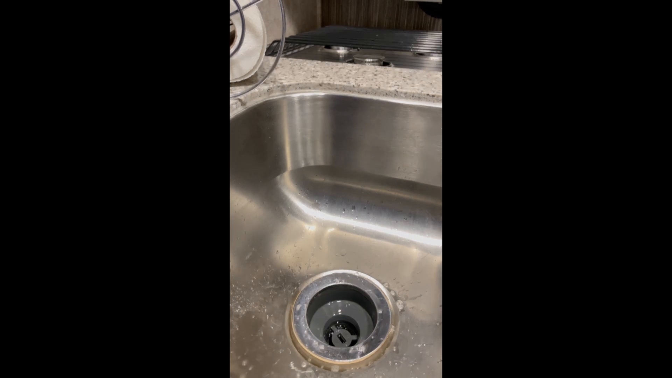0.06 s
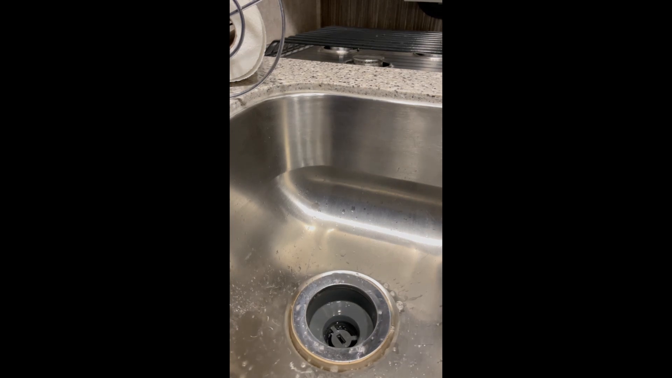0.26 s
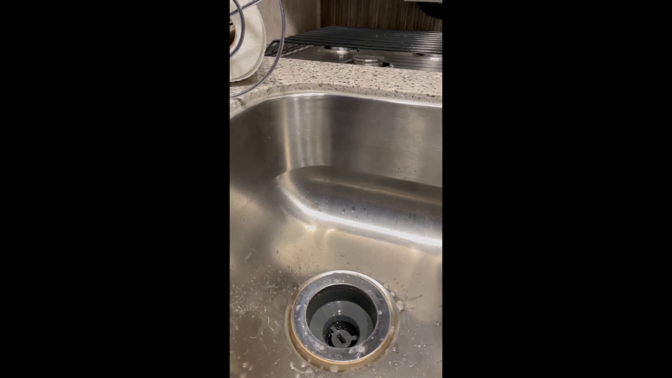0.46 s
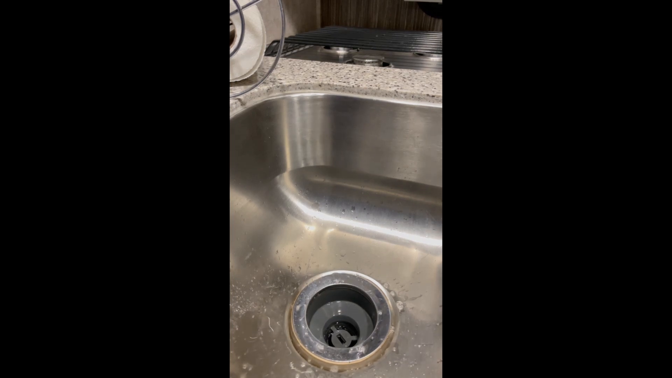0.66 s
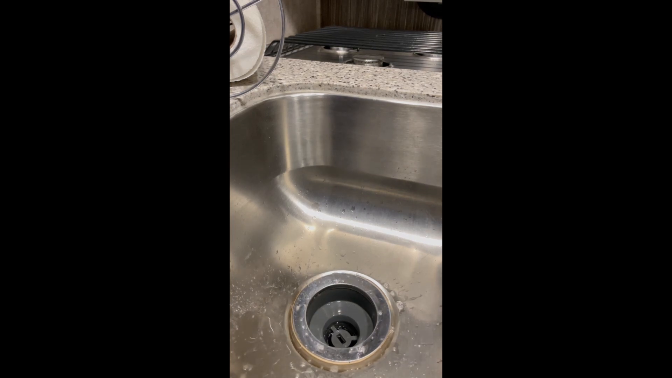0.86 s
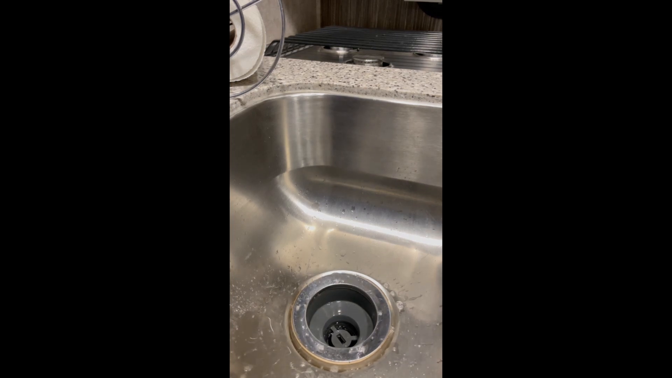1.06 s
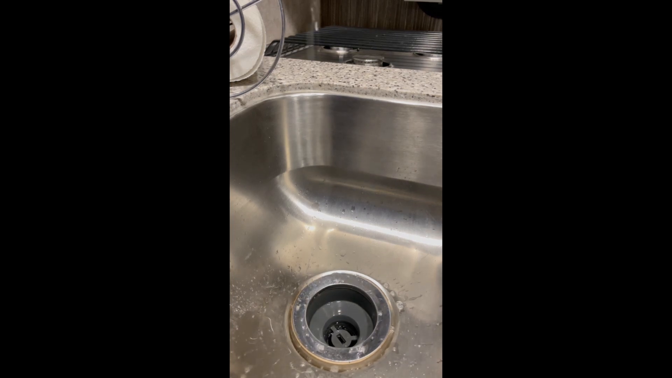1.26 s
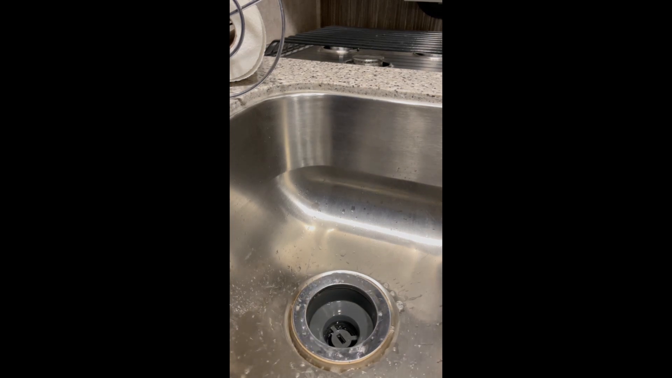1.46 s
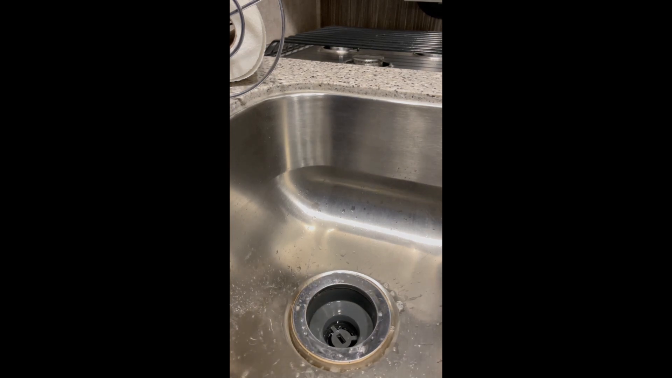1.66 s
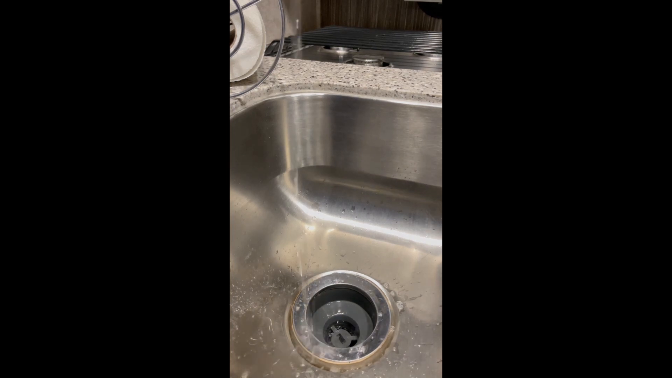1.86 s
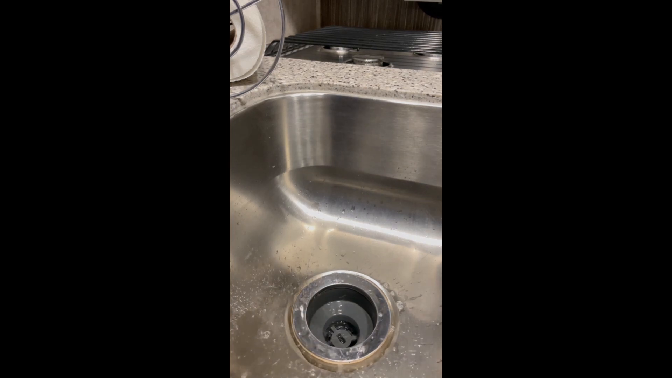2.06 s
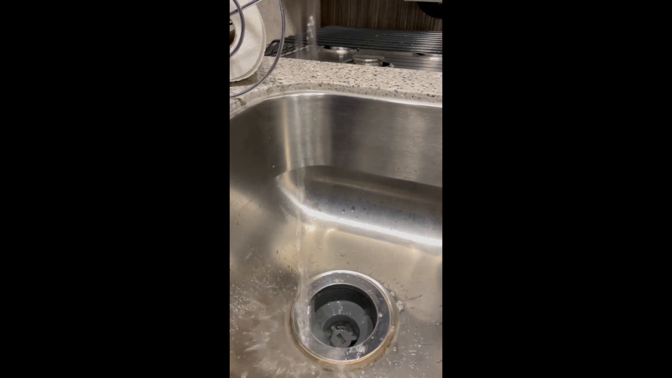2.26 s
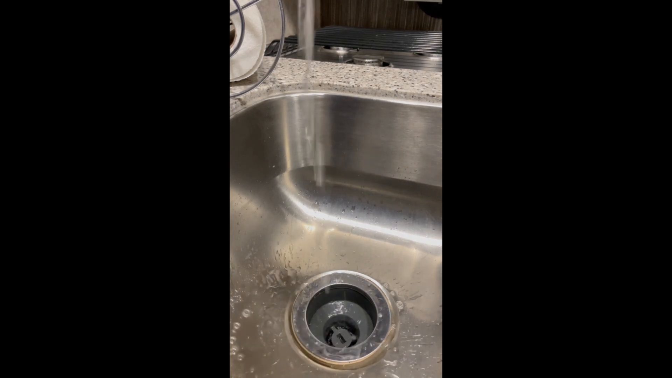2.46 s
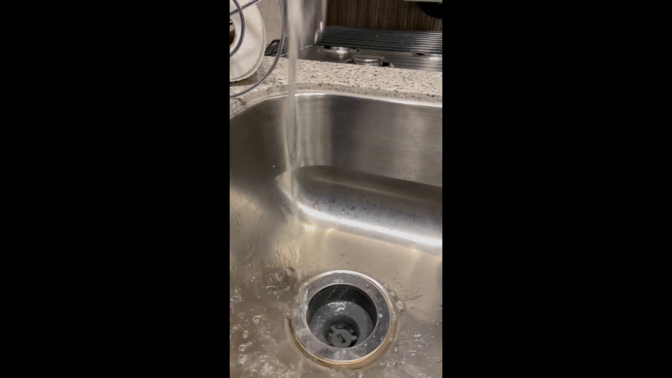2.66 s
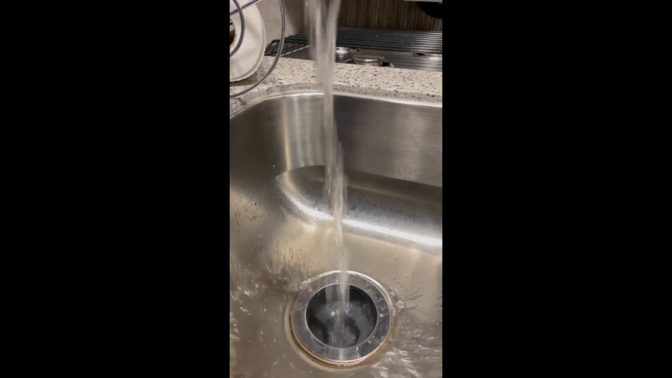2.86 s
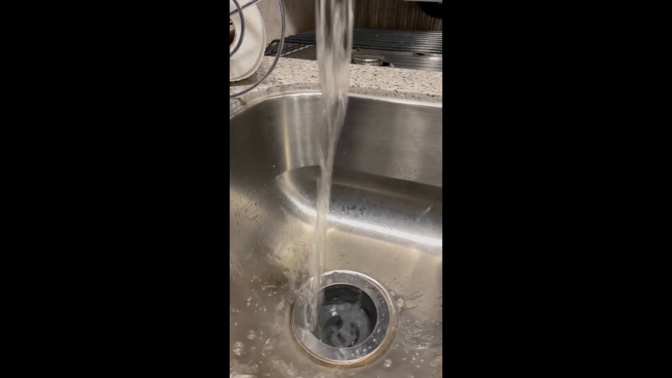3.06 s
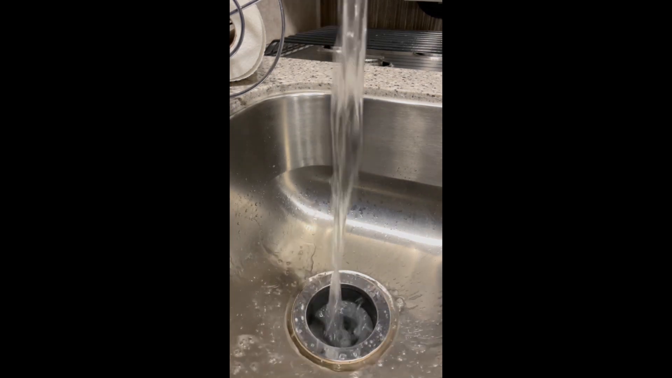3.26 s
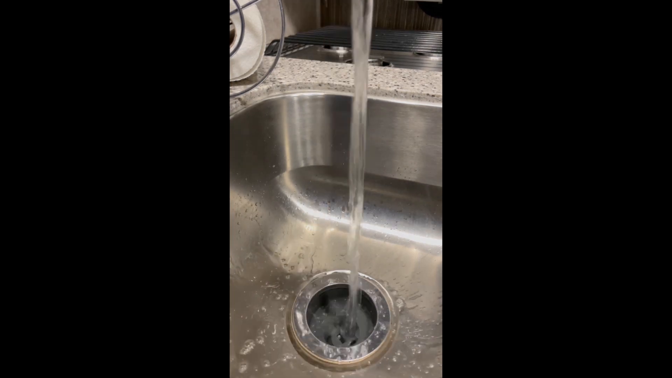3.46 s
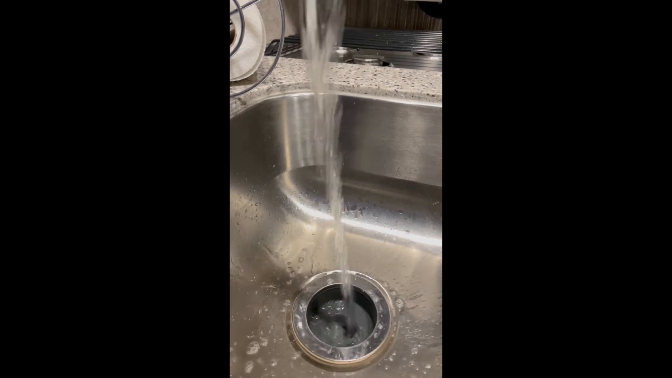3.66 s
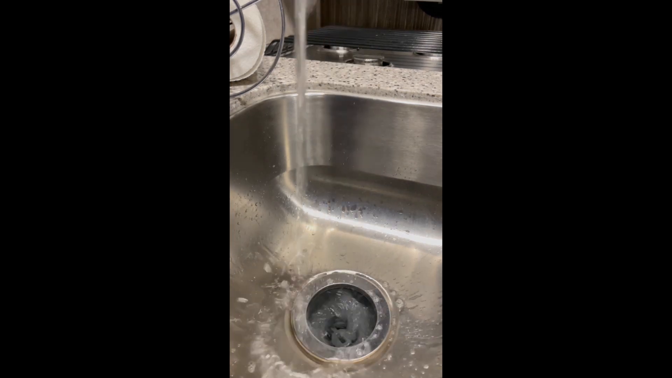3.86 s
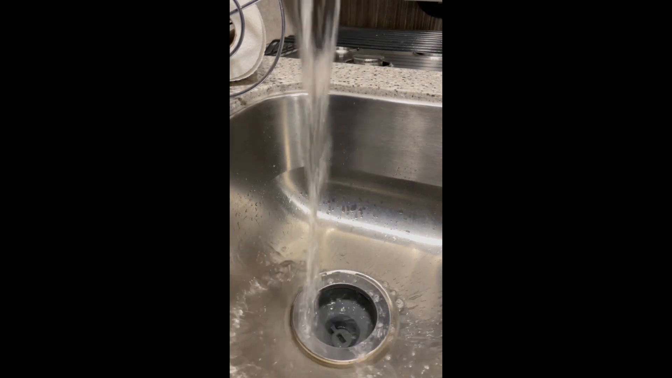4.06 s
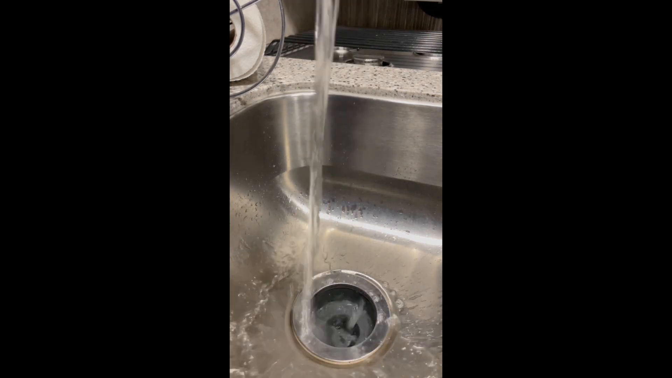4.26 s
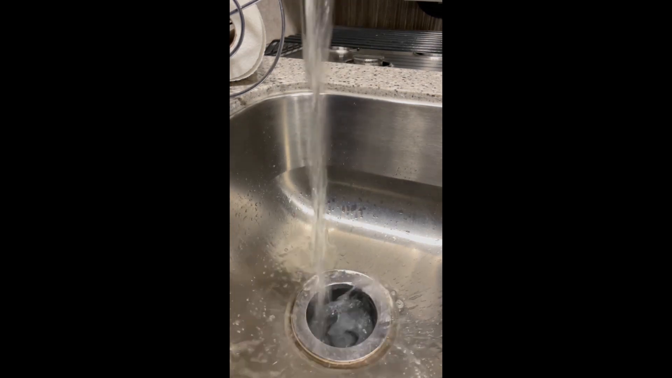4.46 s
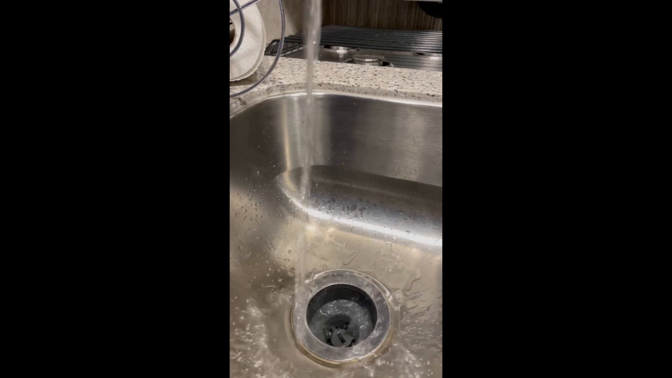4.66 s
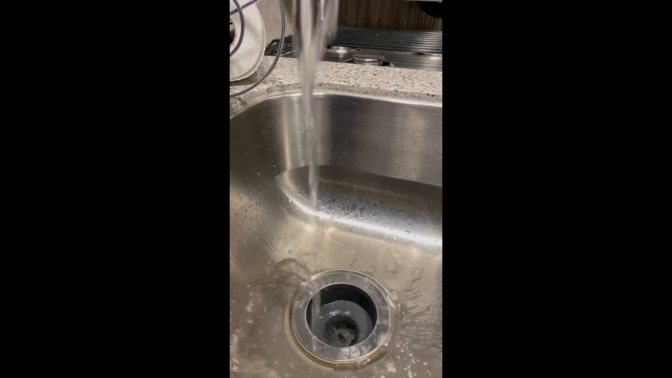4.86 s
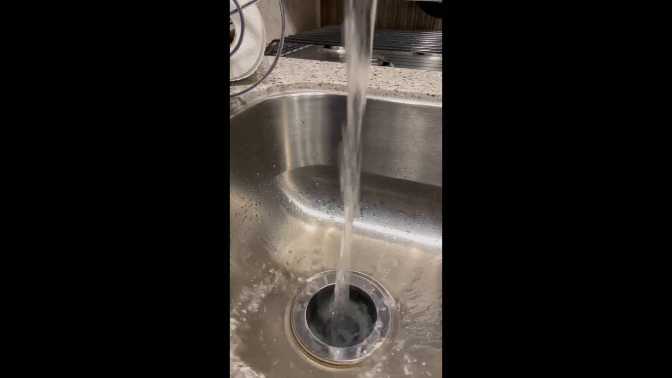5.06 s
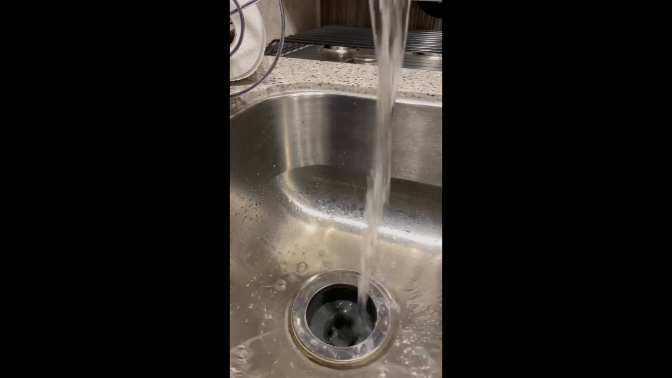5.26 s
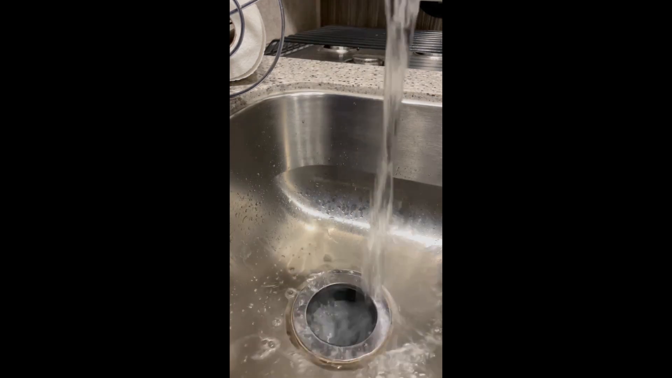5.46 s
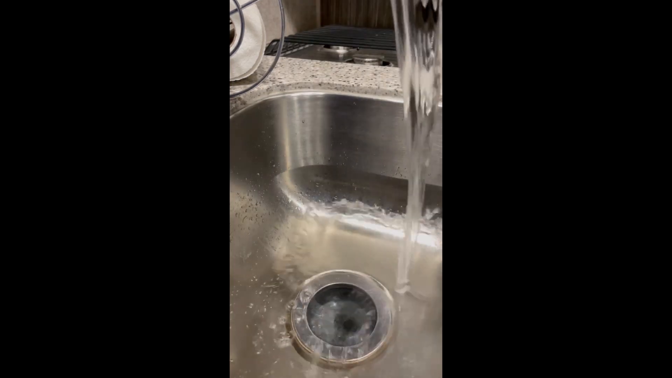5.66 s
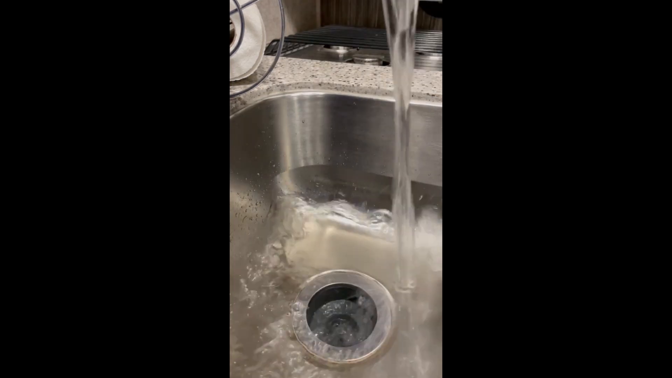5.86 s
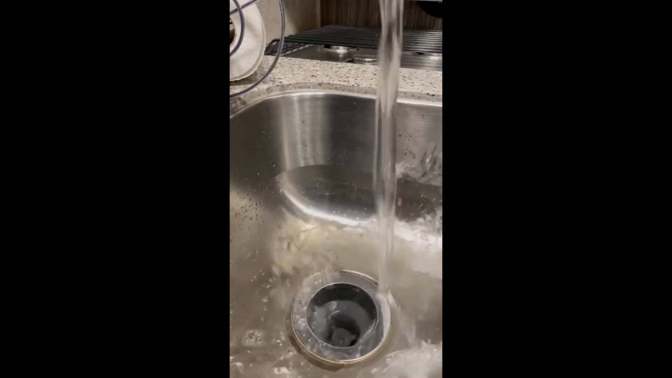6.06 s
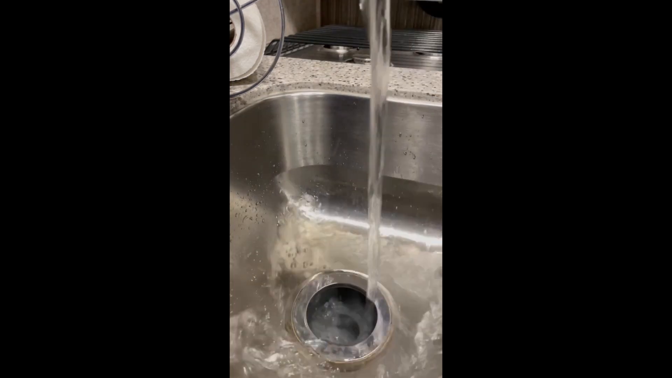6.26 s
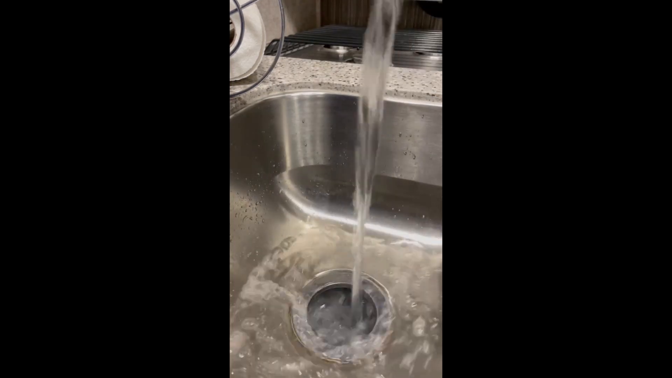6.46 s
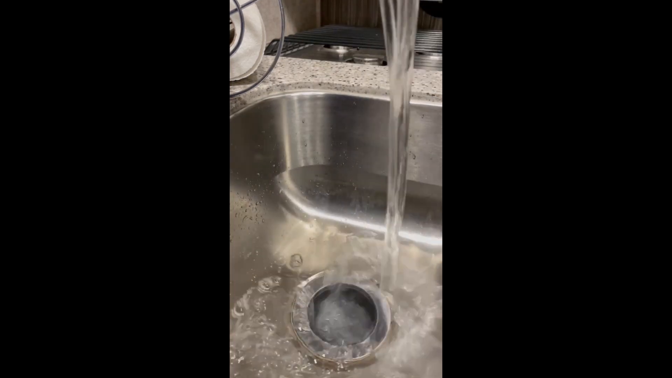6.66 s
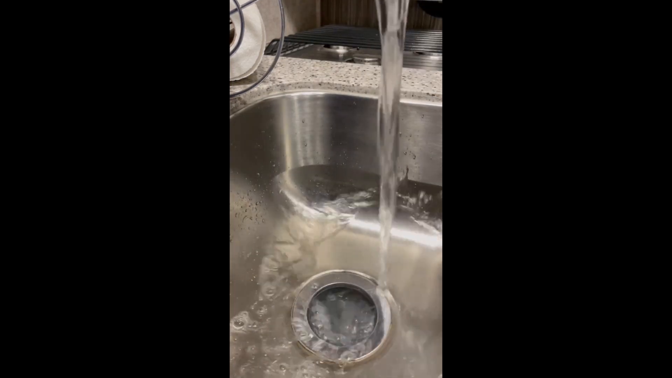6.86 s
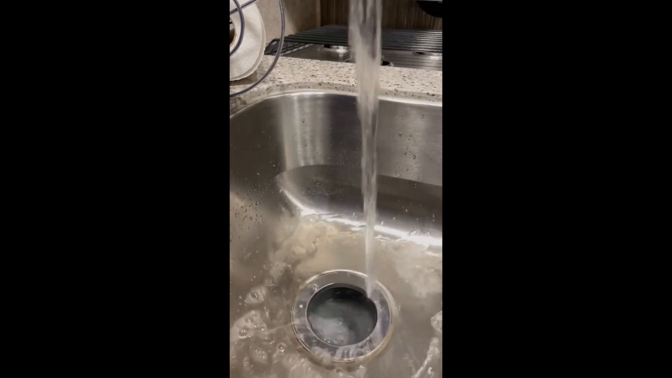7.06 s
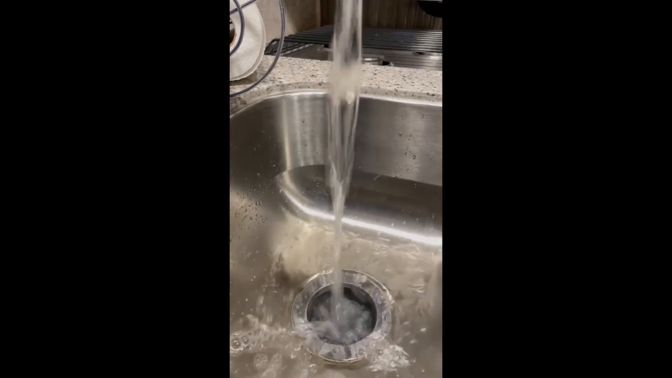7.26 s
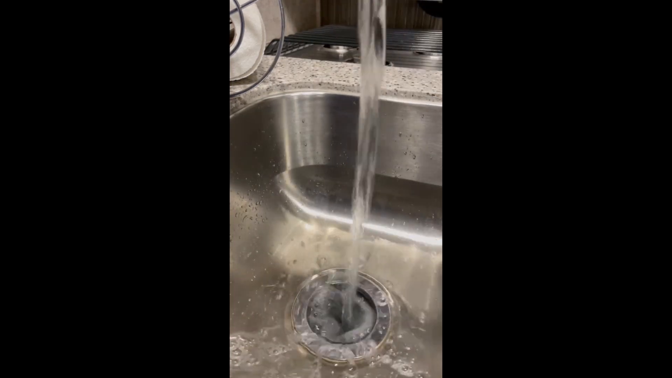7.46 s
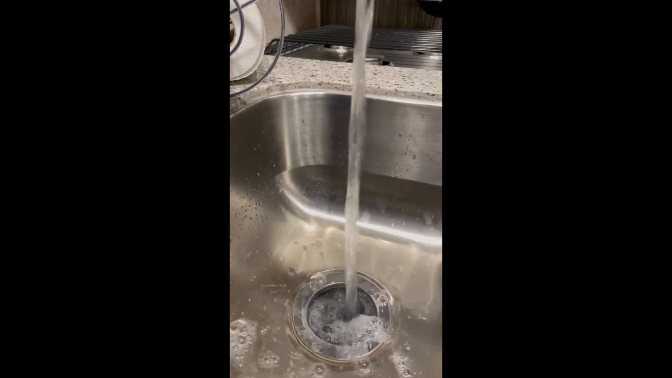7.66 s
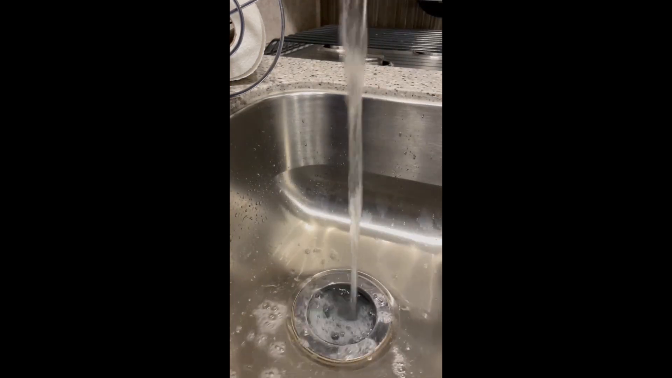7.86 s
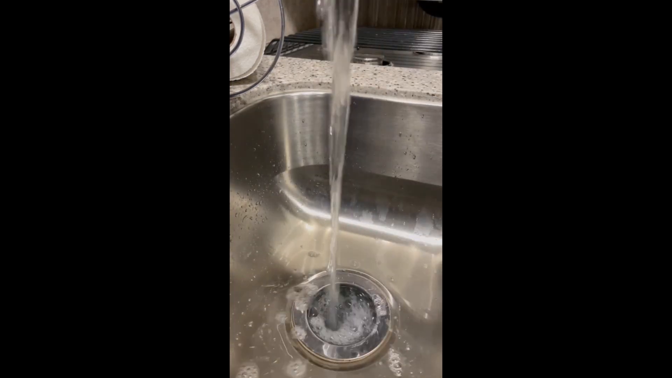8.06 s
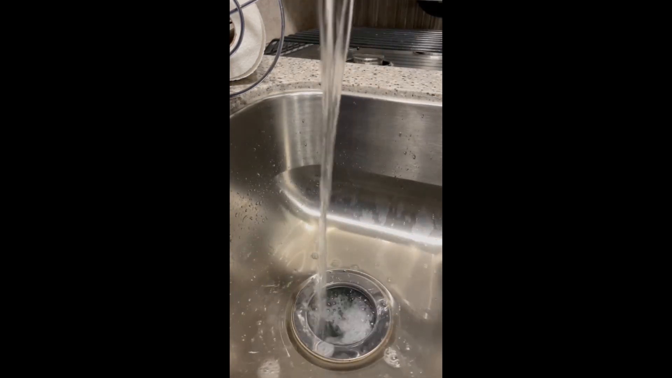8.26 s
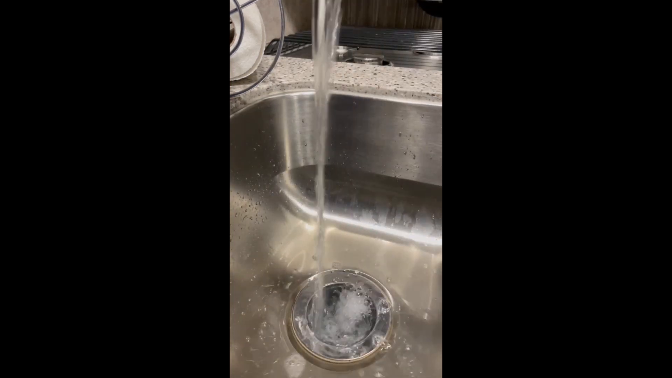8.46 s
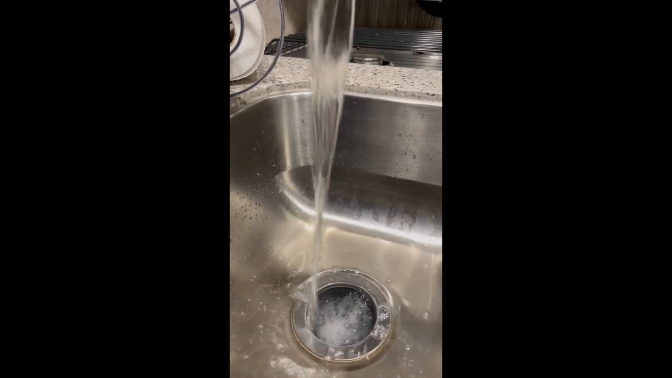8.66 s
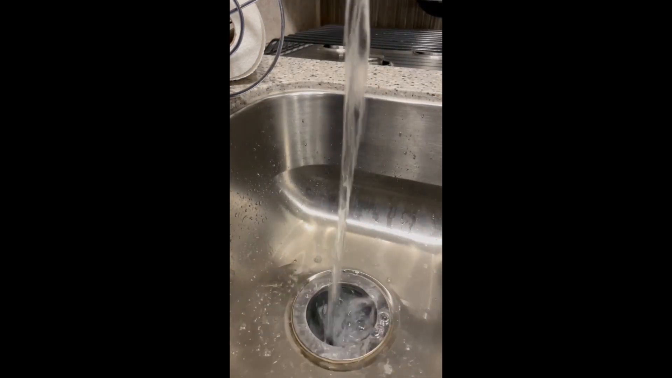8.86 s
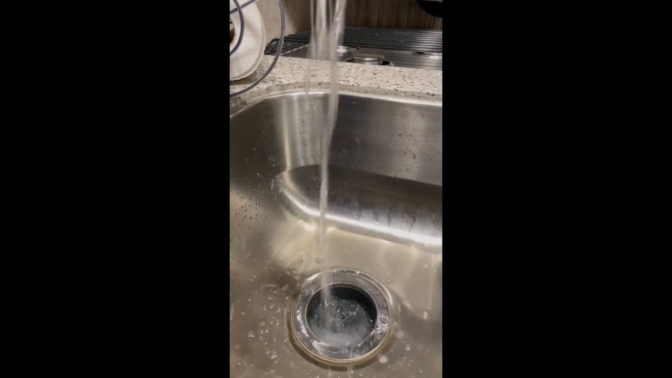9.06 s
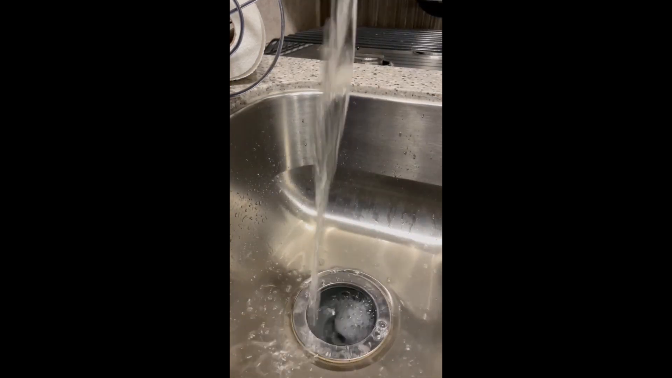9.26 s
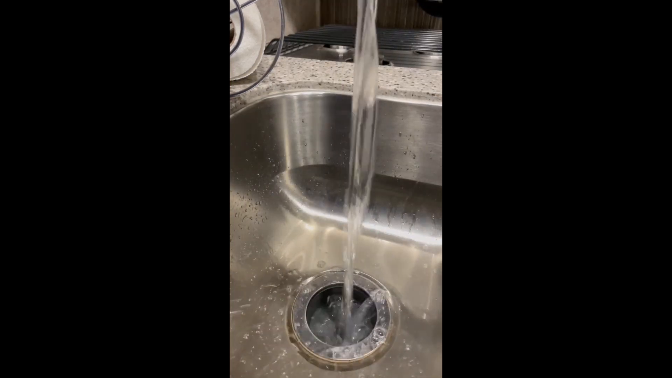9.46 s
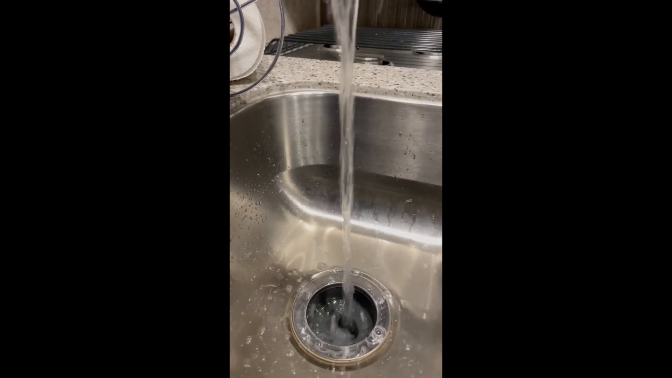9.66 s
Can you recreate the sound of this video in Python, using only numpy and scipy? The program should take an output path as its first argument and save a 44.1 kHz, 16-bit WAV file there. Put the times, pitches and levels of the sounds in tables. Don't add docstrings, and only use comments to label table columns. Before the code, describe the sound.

A quiet kitchen with a faint low hum. At the very start two soft, dull, woody knocks fall about a tenth of a second apart, the second weaker, with a slight rattle. Near silence follows until a tiny dribble at 1.4 s, a longer spill at 1.8 s and a stronger one at 2.2 s, with drops splatting. From about 2.6 s water pours unevenly onto the steel sink: bright hiss and spray, sharp splats, low metallic drumming. Surges come near 3.4 s and heavy slugs at 4.5 to 4.7 s, with thinner moments between. Around 5.3 to 6.6 s the splashing is fullest and brightest. From 7 s the gurgle of air bubbles in the drain is more prominent, with hollow glugs around 8.2 s, the spatter softer near 8. Spray picks up again toward 9.7 s, ending mid-pour. Close phone-like stereo microphone.

```python
import sys
import numpy as np
from scipy import signal
from scipy.fft import rfft, irfft, next_fast_len
from scipy.io import wavfile
from scipy.ndimage import uniform_filter1d

SR = 44100
rng = np.random.default_rng(int(sys.argv[2]) if len(sys.argv) > 2 else 0)


def dump(signal):
    limited = np.clip(np.atleast_2d(signal).T, -1, 1)
    pcm = np.round(limited * 32767).astype(np.int16)
    wavfile.write(sys.argv[1], SR, pcm)


def volts_from_decibels(level):
    exponent = np.asarray(level, float) / 20
    return 10 ** exponent


N = 428211

# t/s, level/dB, half length/s
FLOW_WAVERS = [(2.67, -16, 0.14), (3.43, 7, 0.035), (3.78, 5.5, 0.04), (3.9, -8.5, 0.042),
               (4.0, -10, 0.049), (4.12, 3.5, 0.03), (4.27, -2, 0.03), (4.37, 2, 0.025), (2.89, 3.5, 0.018),
               (3.14, 1, 0.012), (3.2, -3, 0.0083), (5.1, 4.5, 0.076), (5.17, -3, 0.025), (5.34, 1, 0.033),
               (6.0, 3, 0.014), (6.61, 6.5, 0.01), (6.79, 4, 0.028), (6.9, -3.5, 0.047), (7.27, 1.5, 0.026),
               (7.47, 6, 0.051), (7.67, 3.5, 0.045), (7.85, 1.5, 0.039), (8.77, 2, 0.044),
               (8.95, 1.5, 0.028), (9.25, -1.5, 0.033), (9.5, 1, 0.013), (4.53, 8.5, 0.027),
               (4.75, -8.5, 0.044), (4.93, -8.5, 0.11), (5.24, -7.5, 0.087), (5.7, -8.5, 0.13),
               (6.23, 7, 0.034), (6.46, -6.5, 0.018), (7.1, 10.5, 0.027), (8.3, 9, 0.19),
               (8.53, 5.5, 0.034)]
# f/Hz, level/dB per Hz
SPRAY_SPECTRUM = [(6000, -19), (8500, -2), (10500, -2), (12300, 1), (13500, -13.5), (15500, -0.5)]


def stream():
    # f/Hz, level/dB per Hz
    splash_spectrum = [(1400, -67), (2100, -1), (2800, 4), (3400, -2.5), (3900, -0.5), (4400, -1.5),
                       (5200, -60)]
    sizzle_spectrum = [(3800, -15), (4600, -1.5), (5300, -1), (7000, -2), (9000, -3.5), (11000, -15)]
    # f/Hz, level/dB per Hz
    slap_spectrum = [(600, -35), (1150, -5), (3000, -4.5), (3500, -12.5)]
    # t/s, peak level/dB
    thuds = [(2.878, -17), (3.043, -23), (3.187, -21), (3.296, -17), (3.366, -18), (3.438, -21),
             (3.549, -14.5), (3.83, -23), (3.961, -17.5), (4.081, -28), (4.428, -18), (4.688, -14),
             (4.749, -19), (4.791, -33), (4.947, -23), (5.118, -21), (5.225, -28), (5.286, -18),
             (5.387, -28), (5.759, -25), (6.391, -20), (7.456, -36), (7.821, -32), (8.623, -40),
             (8.665, -28), (8.91, -23), (9.009, -19), (9.235, -33), (9.37, -17), (9.558, -17)]
    drum_gain, splash_gain, sizzle_gain, spray_gain = on_steel()
    dull, bright = bursts()
    force = impacts(scatter_db=3.5, fade=0.008, count=1200)

    fizz = swarm(2810, spread=0.335, cycles=5.3, scatter_db=3.5, count=2500, size=300)
    spit = swarm(5240, spread=0.2, cycles=5.4, scatter_db=3.0, count=3500, size=200)
    splash = coloured((0.88 + 0.5 * force) * patchy(3.9) + 0.33 * fizz, splash_spectrum)
    sizzle = coloured((0.32 + 0.48 * force) * patchy(4.7) + 0.3 * spit, sizzle_spectrum)
    mist = coloured((0.33 + 1.1 * force) * patchy(0.5), SPRAY_SPECTRUM)
    hiss = (volts_from_decibels(-1.0) * splash_gain + dull) * splash
    hiss = hiss + (volts_from_decibels(0.07) * sizzle_gain + bright) * sizzle
    hiss = hiss + (volts_from_decibels(8.0) * spray_gain + volts_from_decibels(-7) * bright) * mist

    slap = spills()[-1] * coloured((0.44 + 0.59 * force) * rng.standard_normal(N), slap_spectrum)

    push = volts_from_decibels(26.5) * drum_gain * (0.85 + 0.21 * force) * rng.standard_normal(N)
    s, _, _, thump_db, _ = landings()
    thumps = pulses(s, volts_from_decibels(thump_db + 44))
    s, db = np.transpose(thuds)
    thumps = thumps + pulses(s, volts_from_decibels(db + 46.5))
    return slap + hiss + basin(push + thumps)


def on_steel():
    # t/s, spatter level/dB, fineness/dB
    breakup = [(2.58, -31.5, 12), (3.13, -34, 8.5), (3.68, -33, -1.5), (4.23, -37.5, 9.5), (4.77, -37, 5.5),
               (5.32, -27, 5.5), (5.87, -27.5, 5.5), (6.42, -31, -1.7), (6.97, -33, 2), (7.52, -33, -3.5),
               (8.06, -41, -5), (8.61, -39, 3.5), (9.16, -35, 3.5), (9.71, -29.5, 1)]
    # t/s, level/dB
    weights = [(2.58, -31), (3.1, -28.5), (3.7, -31), (4.2, -31), (4.8, -35), (5.45, -27.5), (5.58, -36),
               (7, -34.5), (7.5, -39), (8.1, -35), (8.6, -36.5), (9.2, -30), (9.71, -30)]
    # t/s, level/dB
    slugs = [
        (2.93, 4),
        (3.43, 8.5),
        (3.54, 4.5),
        (4.49, 5),
        (4.73, 10),
        (5.42, -0.5),
        (6.17, 7.5),
        (7.62, 6),
        (8.26, 6.5),
    ]
    slug_s = 0.041
    weight_follows, spray_follows = 0.13, 0.87
    waver = swells(FLOW_WAVERS)
    spatter, fine = columns(breakup)
    spray = spatter + spray_follows * waver
    spatter = spatter + waver
    weight = columns(weights)[0] + weight_follows * waver
    weight = weight + swells([(s, db, slug_s) for s, db in slugs])
    levels_db = [weight - 0.1, spatter - 0.19 * fine - 4, spatter + 0.48 * fine - 5, spray + 0.76 * fine - 10]
    return spills()[:4] + volts_from_decibels(levels_db)


def spills():
    # t/s, strength/dB, held/s
    first_spills = [
        (1.363, -15, 0.041),
        (1.847, 2.5, 0.23),
        (2.232, 7.5, 0.37),
    ]
    # level/dB, swing per dB of strength
    layers = [
        (-31, 0.87),
        (-72, 0.99),
        (-52, 0.88),
        (-48.5, 1.4),
        (-60, .6),
        (-49, 0.41),
        (-72, 2.3),
        (-48.5, 1.1),
    ]
    attack_s, sag_db_per_s, stop_db_per_s = 0.031, 68, 293
    t = np.arange(N) / SR
    level_db, swing = np.transpose(layers)[..., None]
    out = 0
    for s, db, held in first_spills:
        age = np.maximum(t - s, 0)
        fall_db = sag_db_per_s * age + stop_db_per_s * np.maximum(age - held, 0)
        out = out + np.minimum(age / attack_s, 1) * volts_from_decibels(level_db + swing * (db - fall_db))
    return out


def bursts():
    # t/s, peak level/dB, colour f/Hz
    lumps = [(2.8544, -22, 6420), (3.0774, -29, 6700), (3.125, -11, 7400), (3.2929, -30, 7700),
             (3.4271, -23, 2950), (3.5872, -23, 2280), (3.7798, -12, 6650), (3.926, -29, 7190),
             (4.339, -3.5, 3140), (4.5065, -7, 5070), (4.6606, -8, 7050), (4.8027, -22, 2580),
             (4.8528, -20, 7800), (4.9192, -18, 6480), (5.007, -25, 5260), (5.1492, -11, 3030),
             (5.252, -22, 5170), (5.3238, -9, 2860), (5.5453, -31, 5260), (5.7842, -21, 6320),
             (5.828, -5.5, 2540), (5.9453, -7, 6350), (6.0186, -15, 4780), (6.111, -8, 3940),
             (6.2177, -28, 3920), (6.3704, -13, 5790), (6.4876, -31, 2890), (6.5205, -16, 2520),
             (6.5899, 0, 4110), (7.1187, -20, 5150), (7.4774, -37, 2900), (7.6081, -13, 2540),
             (7.7817, -43, 1830), (8.5315, -11, 2760), (8.91, -10, 3960), (9.2024, -32.5, 5170),
             (9.2588, -32, 5200), (9.3062, -29, 5940), (9.4379, -30, 5810), (9.65, -12, 3760)]
    rise_s, fade_s, turn_hz = 0.002, 0.0093, 4020
    s, db, hz = np.transpose(lumps)
    dull = 1 / (1 + (hz / turn_hz) ** 2)
    gain = volts_from_decibels(np.minimum(db, -12) - 14.5)
    blows = [pulses(s, gain * share) for share in (dull, 1 - dull)]
    fading = signal.lfilter([1], [1, -np.exp(-1 / (fade_s * SR))], blows)
    keep = np.exp(-1 / (rise_s * SR))
    return signal.lfilter([1 - keep], [1, -keep], fading)


def basin(force):
    # f/Hz, width/Hz, level/dB
    bottom_modes = [(136.5, 3.3, -11), (155.93, 5, 6.5), (173.4, 25.5, -8)]
    rim_modes = [(182.2, 22, 1), (208.6, 19.6, -7.5), (224.7, 11, -14), (295, 50, -15)]
    # t/s, nearness to the drain ring/0-1
    landing = [(1.3, 0.41), (3.15, 0.38), (3.35, 1), (3.65, 0.94), (3.8, 0.32), (5.1, 0.2), (5.25, 0.73),
               (5.5, 0.18), (7.1, 0.06), (7.5, 0.68), (8.5, 0.28), (9.7, 0.31)]
    near = np.clip(columns(landing)[0], 0, 1) * np.pi / 2
    ring = filtered(force * np.cos(near), modes(bottom_modes))
    ring = ring + filtered(force * np.sin(near), modes(rim_modes))
    return filtered(ring, lambda hz: 1 / (1 + 1j * hz / 330) ** 2)


def drops():
    s, db, hz, _, crack_db = landings()
    splat = grains(s, volts_from_decibels(db + 2.0), hz, hz * 0.0027, 0.047, rough=0.28, size=600)
    crack = grains(s, volts_from_decibels(crack_db + 9), hz, hz * 0.001, 0.05, rough=5.5, size=300)
    splat = filtered(splat, lambda f: f * f / (f * f + 1200 ** 2))
    return splat + filtered(crack, lambda f: volts_from_decibels(along(SPRAY_SPECTRUM, f)))


def landings():
    drips = [(1.3718, -37.5, 2520, -28.5, -89), (1.3982, -40, 2500, -29.5, -68.5),
             (1.371, -44, 1610, -73, -105), (1.4, -40, 1590, -70, -90), (1.8502, -31, 6500, -40, -48),
             (1.8683, -24.5, 2500, -40, -36), (1.9918, -26, 2050, -28, -58), (2.036, -28, 5040, -54, -60),
             (2.041, -22, 6100, -50, -40.5), (2.2366, -29, 2150, -31, -63), (2.261, -29, 6240, -25, -29),
             (2.4084, -23, 6400, -37, -30), (2.4582, -17.5, 5140, -49, -35.5), (2.531, -41, 7070, -34, -43),
             (2.576, -16.5, 3280, -57, -38), (2.607, -19, 6900, -45, -49), (2.5868, -7.5, 6360, -36, -51),
             (2.637, -20, 2200, -24, -25), (2.668, -13, 5280, -18, -38), (2.7044, -20, 2450, -16.5, -29),
             (2.7492, -26, 2650, -12, -30), (2.792, -42, 7500, -13, -24), (2.852, -11.5, 6800, -17, -31),
             (3.9269, -25, 7100, -20, -32), (4.17, -23, 3070, -47, -28), (4.5058, -17, 4800, -18, -20.5),
              (4.609, -34, 2450, -41, -20.5), (4.64, -19, 6950, -16, -31), (4.6626, -16.5, 4600, -16, -24),
              (4.775, -38, 7000, -26, -33), (4.8044, -20.5, 2500, -20, -29),
              (4.8535, -16.5, 7400, -38, -29), (4.9572, -29, 3100, -29, -24.5),
              (5.7451, -29, 5000, -21, -25), (3.227, -25, 6200, -42, -23.5)]
    # t/s, peak level/dB, colour f/Hz
    large_drops = [(3.077, -16, 6600), (3.1235, -17, 7200), (3.294, -7.5, 8000), (3.429, -15.5, 2770),
                   (3.588, -11, 2240), (5.324, -14.5, 2860), (5.5454, -14, 5230), (5.7866, -9.5, 6700),
                   (5.825, -13.5, 2420), (6.1082, -12.5, 5340), (6.109, -23, 3470), (6.1683, -20, 4970),
                   (6.22, -3, 2950), (6.3723, -13.5, 5740), (6.537, -17.5, 2340), (6.505, -18, 5300),
                   (6.521, -14, 5300), (7.086, -18, 7550), (7.1178, -15.5, 5170), (7.202, -22, 6500),
                   (7.7837, -17, 2060), (8.529, -29, 2720), (9.203, -12, 4920), (9.2594, -16, 5500),
                   (9.4376, -14, 5730), (9.5367, -13.5, 2830)]
    # t/s, peak level/dB
    wall_ticks = [(3.1243, -33), (3.225, -19), (3.3028, -14), (3.4345, -15), (3.47, -19), (3.8341, -19),
                  (3.8581, -21), (4.0322, -26), (4.17, -21),
                  (5.2538, -24), (5.3565, -21), (5.7431, -33), (5.7447, -29), (5.7716, -16), (5.794, -19),
                  (6.081, -14), (6.1303, -25), (6.1705, -12), (6.482, -21), (6.5328, -32), (6.7169, -18),
                  (6.778, -17.5), (7.5645, -23), (8.4779, -18), (8.6835, -23), (8.909, -17), (9.2582, -26),
                  (9.3045, -25), (9.437, -28), (9.538, -15), (9.564, -20.5)]
    thump_db, crack_db = -12.5, -18.5
    tick_hz, tick_db = 6300, -7
    large = [(s, db, hz, db + thump_db, db + crack_db) for s, db, hz in large_drops]
    ticks = [(s, db + tick_db, tick_hz, -120, db + tick_db) for s, db in wall_ticks]
    return np.transpose(drips + large + ticks)


def drain():
    # f/Hz, level/dB per Hz
    pocket_spectrum = [(200, -21), (300, 4), (440, -4), (540, -4), (600, -0.5), (700, -6), (900, -9.5),
                       (1200, -21.5)]
    bubble_spectrum = [(600, -14), (850, -7.5), (1150, 2.5), (1300, 0), (1450, 0.5), (1800, -3.5),
                       (2000, -6), (2600, -16)]
    rumble_spectrum = [(25, -15), (50, -7.5), (75, 11), (100, 7.5), (140, -58)]
    # t/s, peak level/dB, pitch f/Hz
    single_bubbles = [(3.1029, -23, 1760), (3.2939, -31, 1180), (3.4341, -26, 1230), (3.5349, -23, 1230),
                      (3.6097, -15, 1820), (4.364, -22, 1450), (5.455, -20, 1110), (5.521, -17.5, 1460),
                      (5.6935, -22.5, 1330), (5.7708, -25, 1690), (5.8307, -17, 2100), (5.909, -24, 1420),
                      (6.0045, -16, 980), (6.249, -14.5, 1400), (6.326, -19, 1150), (6.3963, -19, 1400),
                      (6.5328, -14.5, 1400), (6.7786, -20, 1130), (6.9293, -22.5, 1130),
                      (7.11, -13.5, 1250), (7.1876, -19, 1170), (7.3293, -20, 1150), (7.781, -25, 1250),
                      (8.1808, -22, 1130), (8.2598, -14, 1420), (8.3629, -21, 1700), (8.428, -22, 1660),
                      (8.463, -22, 1600), (8.5465, -22, 1150), (8.63, -20, 1460), (8.726, -22.5, 1170),
                      (8.776, -16.5, 1480), (8.8887, -29, 1180), (9.0585, -19.5, 1140), (9.092, -20, 1420),
                      (9.1673, -16, 1070), (9.225, -26, 1150), (9.4384, -23, 1640), (9.494, -20, 1150),
                      (9.685, -20, 1090)]
    glugs = [(2.952, -27, 350), (3.546, -28, 342), (3.927, -32, 333), (4.489, -32, 331),
             (4.805, -26.5, 334), (5.061, -32, 377), (5.162, -24, 585), (5.287, -17.5, 446),
             (5.563, -26, 377), (6.792, -25.5, 606), (7.122, -27, 340), (7.228, -19, 433),
             (7.744, -24, 580), (7.822, -25, 575), (7.912, -24, 570), (8.222, -14, 597),
             (8.407, -23.5, 590), (8.545, -20, 872), (9.229, -26, 514), (9.363, -31, 340),
             (9.454, -24, 443), (9.686, -18, 347)]
    liquid = 0.22
    deep, large, small = in_drain()
    clumps = impacts(scatter_db=3.0, fade=0.021, count=500)
    pockets = swarm(534.5, spread=0.294, cycles=8.7, scatter_db=1.5, count=700, size=1200)
    bubbles = swarm(1272, spread=0.27, cycles=6.5, scatter_db=2.0, count=1600, size=700)
    rumble = coloured(patchy(2.7), rumble_spectrum)
    low = coloured((0.49 + 0.44 * clumps) * (patchy(4.7) + liquid * pockets), pocket_spectrum)
    high = coloured((0.53 + 0.44 * clumps) * (patchy(2.3) + liquid * bubbles), bubble_spectrum)
    s, db, hz = np.transpose(single_bubbles + glugs)
    plops = grains(s, volts_from_decibels(db + 2.0), hz, 4 + hz * 0.0024, 0.038, rough=0.083, size=1600)
    return volts_from_decibels(-1.0) * deep * rumble + volts_from_decibels(-4.0) * large * low + volts_from_decibels(-1.04) * small * high + plops


def in_drain():
    # t/s, level/dB, large over small pockets/dB
    air_flow = [(2.58, -43.5, -3), (3.1, -45, 7), (3.4, -33, 0), (3.78, -38, -6), (3.86, -43.5, 0),
                (4.6, -42, 4.5), (5.04, -42.5, 3), (5.1, -33.5, 11), (5.58, -33.5, -4.5), (5.62, -38.5, -6),
                (5.96, -43, 0), (6.03, -31.5, -1), (7.08, -36, -11.5), (7.14, -30, 0), (7.65, -37, 2),
                (8.85, -35, -4), (9.71, -35, 1.5)]
    # t/s, gurgle level/dB, pipe boom level/dB
    gulps = [(3.72, 4.5, 10), (4.431, 11, 10), (5.181, 7, 3.5), (5.54, 5.5, 6), (6.02, 5, 0), (7.33, 2, 14),
             (8.25, 7, 0), (9.02, 3, 7), (2.95, 8.5, -3), (3.16, 10, -4), (4.1, -0.5, 6), (4.88, -10, .1),
             (5.3, 0, -8), (5.45, -4, -7), (7.24, 2.5, 9), (7.55, 1.5, 7), (7.78, 6, 3), (7.93, 3, 4),
             (8.55, -5, -2), (8.81, 3, -2), (9.461, 7.5, 8), (9.71, 9.5, 4)]
    # t/s, rumble level/dB
    pipe_fill = [
        (2.58, -43),
        (5.5, -43),
        (9.71, -40),
    ]
    gulp_s = 0.027
    air_follows = 0.29
    air, large = columns(air_flow)
    air = air + air_follows * swells(FLOW_WAVERS) + swells([(s, db, gulp_s) for s, db, _ in gulps])
    boom = columns(pipe_fill)[0] + swells([(s, db, gulp_s) for s, _, db in gulps])
    return spills()[4:-1] + volts_from_decibels([boom, air + 0.5 * large - 3, air - 0.39 * large - 3.5])


def knocks():
    # t/s, level/dB
    blows = [
        (0.036, -16),
        (0.143, -20),
    ]
    # f/Hz, level/dB, 60 dB decay time/s
    panel_modes = [(59.2, -8, 0.59), (100, 8, 0.07), (192.5, -5.5, 0.29), (260, -12.5, 0.26),
                   (447, -18.5, 0.17)]
    # f/Hz, level/dB per Hz
    rattle_spectrum = [(100, -6), (250, 0), (500, -18), (800, -25.5), (2500, -40.5), (5000, -58),
                       (9000, -120)]
    ring, rattle = np.zeros(N), np.zeros(N)
    t = np.arange(SR // 2) / SR
    panel = sum(volts_from_decibels(level - 60 * t / t60) * np.sin(2 * np.pi * hz * t) for hz, level, t60 in panel_modes)
    panel = panel * (1 - np.exp(-(t / 0.0043) ** 2))
    shake = volts_from_decibels(-60 * t / 0.055) + volts_from_decibels(-17 - 60 * t / 0.4)
    shake = shake * (1 - np.exp(-t / 0.0013))
    for s, db in blows:
        ring[round(s * SR):][:len(t)] -= volts_from_decibels(db) * panel
        rattle[round((s - 0.004) * SR):][:len(t)] += volts_from_decibels(db) * shake
    s, db = np.transpose(blows)
    tick = grains(s - 0.003, volts_from_decibels(db - 39), np.full(2, 6500.), 16.0, 0.05, rough=1.5, size=300)
    return tick + ring + volts_from_decibels(-8) * rattle * coloured(rng.standard_normal(N), rattle_spectrum)


def kitchen():
    # f/Hz, level/dB per Hz
    hum_spectrum = [(15, -51), (25, 11), (124, 1), (615, -22), (2750, -33.5), (12000, -59), (15600, -82),
                    (22000, -120)]
    # f/Hz, correlation/-1 to 1
    likeness = [(60, 0.94), (130, 0.95), (290, 0.7), (640, -0.54), (1400, -0.11), (15000, -0.17)]
    hum_db = -54

    def response(hz):
        turn = np.arccos(np.clip(along(likeness, hz), -1, 1)) / 2
        return volts_from_decibels(along(hum_spectrum, hz)) * [np.ones_like(hz), np.tan(turn)]

    mid, side = filtered(np.array([patchy(1.0), patchy(1.5)]), response)
    return volts_from_decibels(hum_db) * np.array([mid + side, mid - side]) / np.std(mid)


def ports(x):
    # f/Hz, phase by which left leads/rad, left over right/dB, scattered level/dB
    port_table = [(100, 0.5, 1, -38), (385, 0.4, 2, -6.5), (820, -2, 3, -18), (1150, 1, -7, -11.5),
                  (1750, 0.35, -1, -7.5), (2500, 1.5, 3.5, -7), (3560, 1.29, 0, -3.5),
                  (4700, 1.77, 0.5, -7.5), (5730, 0.52, 0.5, -3.5), (7650, 1.57, -1.5, -5.5),
                  (8420, 3.5, 2.1, -3.5), (11100, 3.5, 0.5, -10), (12250, 4.5, 0, -20), (15650, 9, 0, -18)]
    z = signal.stft(np.pad(x, (70, 0)), nperseg=128)[2]
    a, b = uniform_filter1d(rng.standard_normal((2, 2) + z.shape), size=3)
    scatter = signal.istft(z * (unit(a) + 1j * unit(b)) / np.sqrt(2), nperseg=128)[1][:, :N]

    def apart(hz):
        return hz ** 2 / (hz ** 2 + 300 ** 2)

    def both(hz):
        phase = 0.5j * apart(hz) * along(port_table, hz, axis=1)
        half = volts_from_decibels(along(port_table, hz, axis=2) / 2) * np.exp(phase)
        return np.array([half, 1 / half])

    return filtered(x, both) + filtered(scatter, lambda hz: apart(hz) * volts_from_decibels(along(port_table, hz, axis=3)))


def grains(s, gain, hz, cycles, rise, rough, size):
    t = np.arange(size) / SR
    age = t * (hz / cycles)[:, None]
    tone = np.sin(2 * np.pi * hz[:, None] * t * (1 + rise * age / 2))
    tone = tone + rough * rng.standard_normal(age.shape)
    wave = gain[:, None] * tone * (1 - np.exp(-14 * age)) * np.exp(-3 * age)
    at = (s * SR).astype(int)[:, None] + np.arange(size)
    return np.bincount(at.ravel(), wave.ravel(), N + size)[:N]


def swarm(hz, spread, cycles, scatter_db, count, size):
    u, g = rng.random((count, 2)), rng.standard_normal((count, 2))
    gain = uneven(u[:, 1], scatter_db)
    pitch = hz * np.exp(spread * g[:, 0])
    ringing = cycles * np.exp(0.2 * g[:, 1])
    return unit(grains(u[:, 0] * N / SR, gain, pitch, ringing, 0.25, 0.035, size))


def impacts(scatter_db, fade, count):
    u = rng.random((count, 2))
    blows = pulses(u[:, 0] * N / SR, uneven(u[:, 1], scatter_db))
    return unit(signal.lfilter([1], [1, -np.exp(-1 / (fade * SR))], blows))


def uneven(u, scatter_db):
    return volts_from_decibels(scatter_db * np.minimum(-np.log(1 - u), 3.5))


def pulses(s, strength):
    return np.bincount((s * SR).astype(int), strength, N)


def patchy(depth_db):
    z = signal.stft(rng.standard_normal(N), nperseg=256)[2]
    field = uniform_filter1d(rng.standard_normal(z.shape), 5, 0)
    field = uniform_filter1d(field, 8, 1)
    return signal.istft(z * volts_from_decibels(depth_db * unit(field)), nperseg=256)[1][:N]


def modes(table):
    return lambda f: sum(volts_from_decibels(db) * 1j * f * w / (c * c - f * f + 1j * f * w) for c, w, db in table)


def coloured(x, spectrum):
    return unit(filtered(x, lambda hz: volts_from_decibels(along(spectrum, hz))))


def filtered(x, response):
    m = next_fast_len(N + SR // 2)
    return irfft(rfft(x, m) * response(np.fft.rfftfreq(m, 1 / SR)), m)[..., :N]


def along(points, hz, axis=1):
    table = np.array(points)
    return np.interp(np.log(hz + 1), np.log(table[:, 0] + 1), table[:, axis])


def columns(rows):
    t = np.arange(N) / SR
    s, *cols = np.transpose(rows)
    out = np.array([np.interp(t, s, c) for c in cols])
    out[0, t < s[0]] = -150
    return out


def swells(rows):
    t = np.arange(N) / SR
    return sum(db * np.exp(-0.5 * ((t - s) / half) ** 2) for s, db, half in rows)


def unit(x):
    return x / np.sqrt(np.mean(x ** 2) + 1e-20)


def scene():
    # f/Hz, width/Hz, level/dB
    wall_modes = [(559, 19, 0), (872, 20, 3.5), (1146, 18, 5), (1422, 26, 0), (1645, 45, -0.5),
                  (1820, 17, 8.5), (2615, 22, 5), (2860, 22, 4), (3220, 44, -3.5), (3760, 40, 1),
                  (3970, 45, 4.5), (5300, 29, 6.5)]
    water = stream() + drops() + drain()
    water = filtered(water, lambda f: 1 + 0.6 * modes(wall_modes)(f))
    return ports(water + knocks()) + kitchen()


def low_pass(x):
    return signal.sosfilt(signal.butter(12, 16970, fs=SR, output="sos"), x)


def record(dry):
    top_hz = 15800

    def mic(hz):
        return hz ** 2 / (hz ** 2 + 40 ** 2) * volts_from_decibels(np.clip((top_hz - hz) / 12, -36, 0))

    return low_pass(filtered(dry, mic))


dry = scene()
out = record(dry)
dump(out)
```